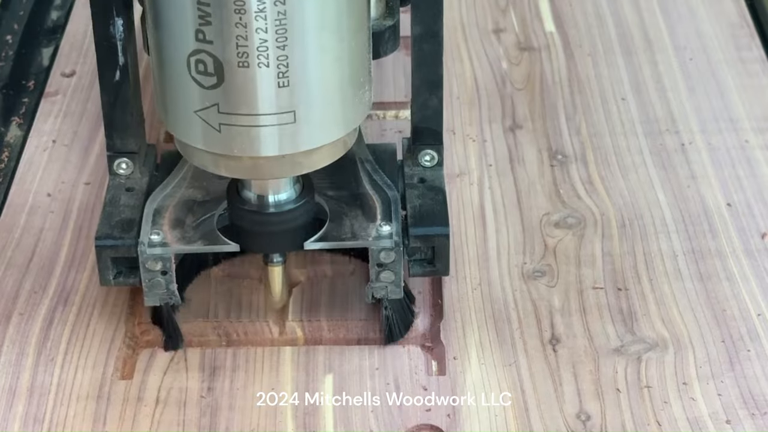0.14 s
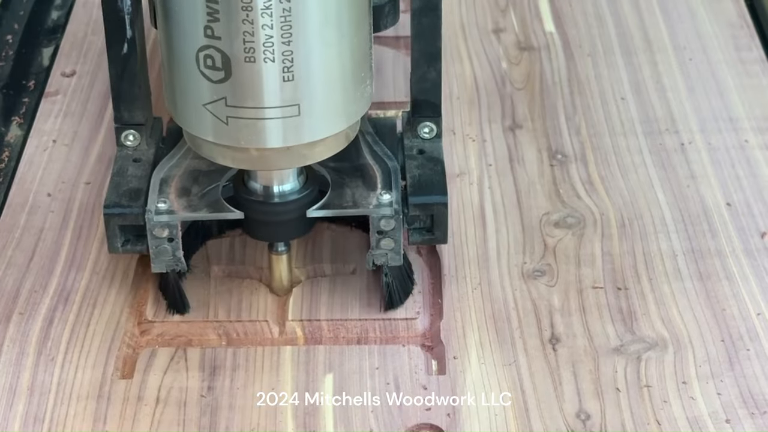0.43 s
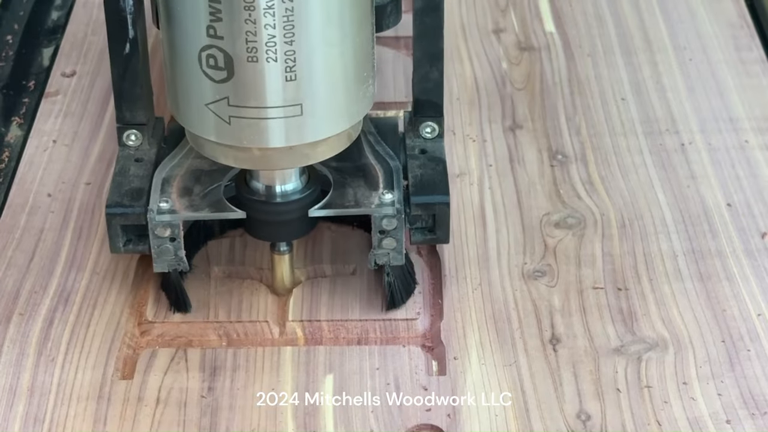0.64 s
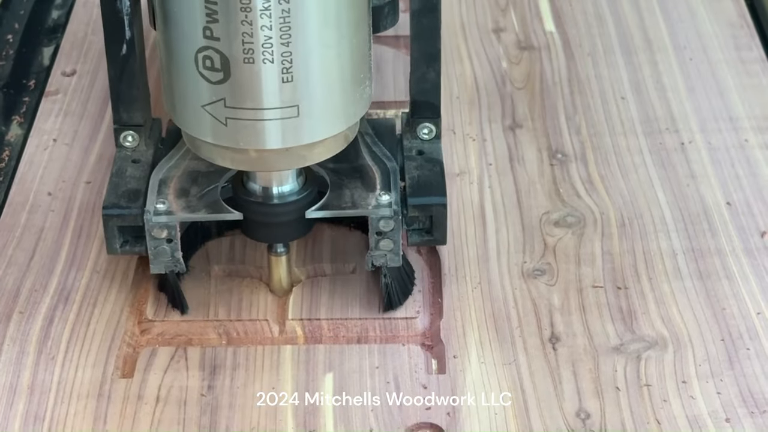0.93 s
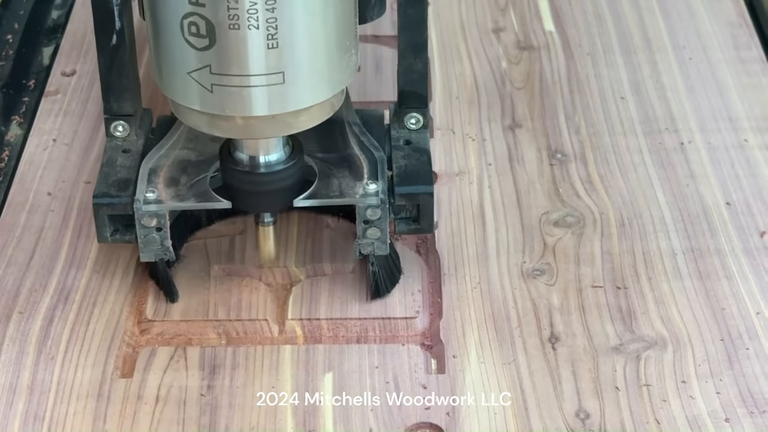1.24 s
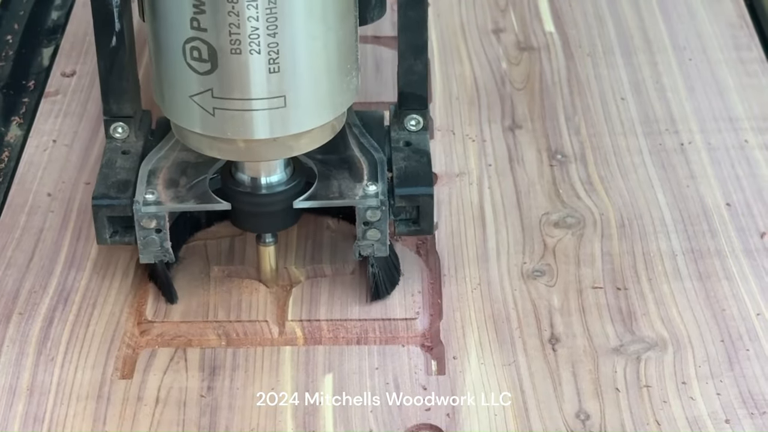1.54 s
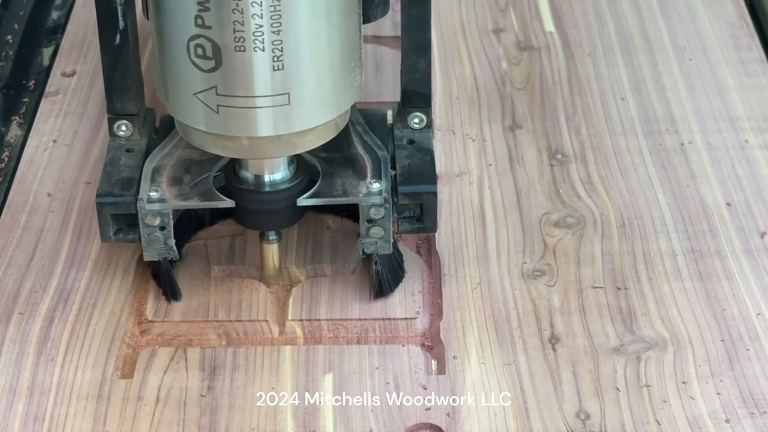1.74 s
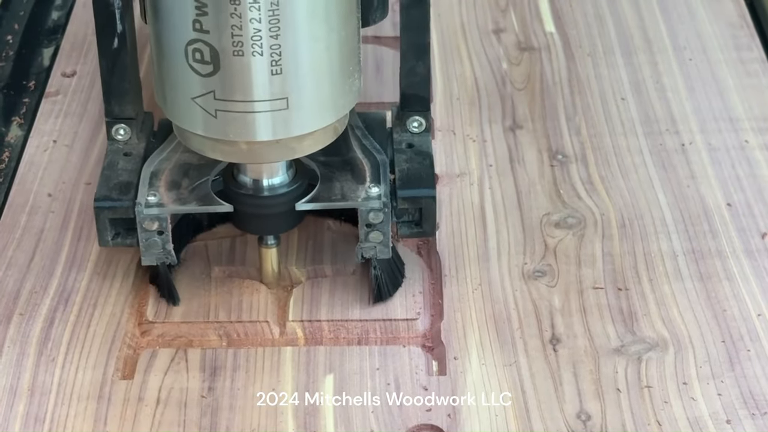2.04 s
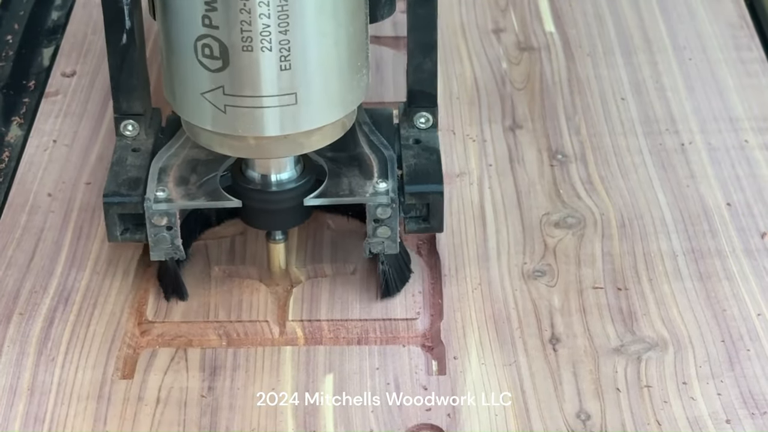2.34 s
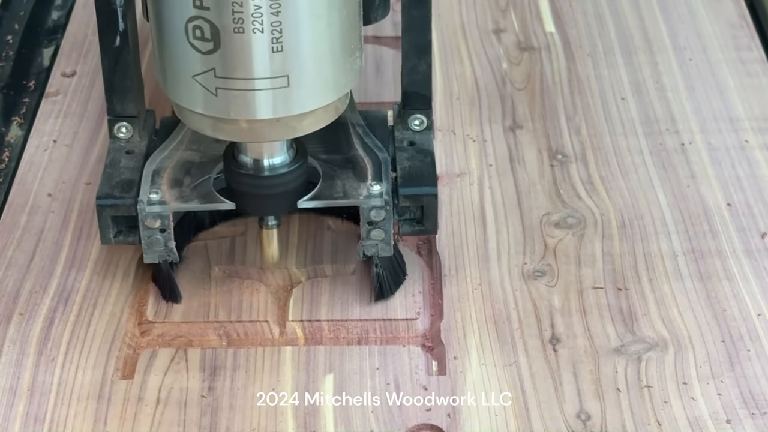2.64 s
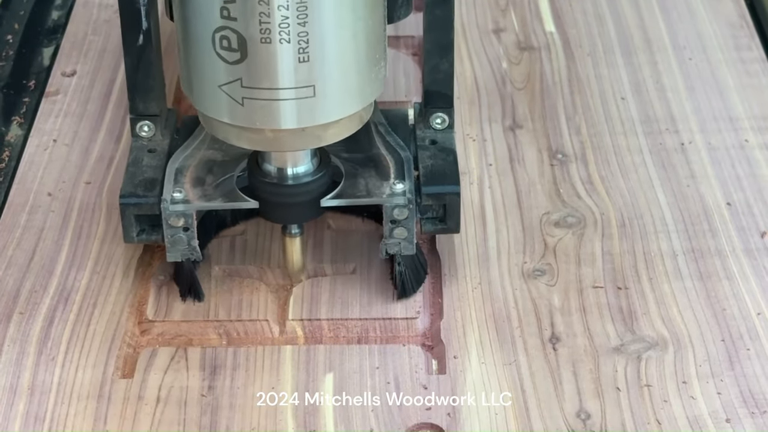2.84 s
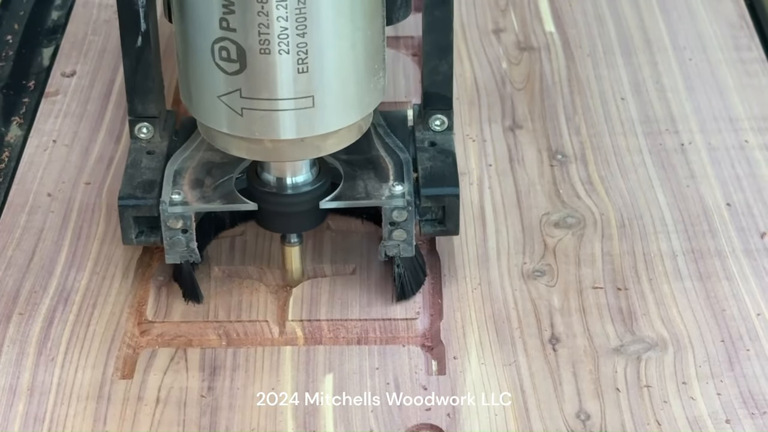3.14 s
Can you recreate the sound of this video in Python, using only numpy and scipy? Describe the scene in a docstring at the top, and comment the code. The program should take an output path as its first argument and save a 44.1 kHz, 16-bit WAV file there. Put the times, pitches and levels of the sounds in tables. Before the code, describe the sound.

Heard up close in a workshop, a wood router hums and hisses steadily, with a faint high whistle and soft thuds from its frame. Brief buzzing bites into the board bunch together past the middle, followed by two gentler cuts.

```python
"""A CNC router carves a wooden board in a workshop, heard from close by.
From the start the spindle hums at about 14850 rpm under a fan tone, rushing air and gantry rumble.
At 0.35 s the lift motor begins to whistle, holding its height; soon the gantry's frame thuds softly.
From 0.9 s the bit catches the wood in short buzzes, one chip per turn, most densely at 2.2 to 2.5 s.
Two longer, softer cuts follow near 3 s, and the machine runs on."""
import sys
import numpy as np
from scipy import signal
from scipy.fft import rfft, irfft
from scipy.io import wavfile

SR = 44100
rng = np.random.default_rng(int(sys.argv[2]) if len(sys.argv) > 2 else 0)


def bounce(signal):
    """Save signal as a 16-bit WAV file at the path given by the first command-line argument."""
    frames = np.transpose(np.atleast_2d(signal))
    limited = np.clip(frames, -1, 1)
    pcm = np.round(limited * 32767).astype(np.int16)
    wavfile.write(sys.argv[1], SR, pcm)


N = 145530
TIME = np.arange(N) / SR
BINS_HZ = np.maximum(np.fft.rfftfreq(N, 1 / SR), 1)
SPINDLE_HZ = 247.6


def cutting(speed_hz):
    """Source and filter: each chip knocks the board, cracks off in splinters and rings the bit."""
    # catches of the bit: start_s, length_s, level_db, edge_db, splinters_db (both relative to level)
    bites = [(0.897, 0.015, -7.5, 6.5, -13), (0.981, 0.0032, -6, 5, -6), (0.99, .002, -4.5, 1.5, -2.5),
             (1.352, 0.045, -9, -17, -12), (1.497, 0.04, -14, -26, -18), (2.172, 0.0048, -6.5, -8, -6),
             (2.182, 0.016, -4, -5, -8.5), (2.348, 0.005, -12, 1.5, -0.5), (2.389, .002, -8, 4, -5),
             (2.397, 0.013, -7, 2.5, -23), (2.414, 0.013, 3.5, -12, -19), (2.434, 0.017, 1, -11, -22),
             (2.463, 0.016, -5, 4, -20), (2.487, 0.0035, -3, 4.5, -6), (2.498, 0.019, -2.5, 2, -10),
             (2.529, 0.0036, -10, 4, -7), (2.537, 0.007, -4.5, -3, -4), (2.892, 0.09, -13.5, -25, -23),
             (3.04, 0.11, -17, -21, -10)]
    # responses of the board and of the cracking edge: frequency_hz, density_db
    board = [(200, -85.5), (350, -70.5), (495, -66), (745, -67.5), (1000, -70.5), (1240, -77.5),
             (1480, -73), (1730, -69.5), (2100, -70.5), (2700, -82.5), (4000, -85), (9000, -110)]
    edge = [(300, -96), (900, -78), (1240, -77), (1480, -70), (1730, -76.5), (1980, -67), (2230, -67.5),
            (2700, -73), (3100, -72.5), (3400, -79), (4000, -79), (5000, -82.5), (6500, -82), (8000, -108),
            (11000, -101), (16000, -112)]
    # mode of the bit: pitch_hz, width_hz, density_db
    bit_mode = [(2997, 91, -74.5)]
    turns = np.cumsum(speed_hz) / SR
    chips = chip_impulses(turns)
    since_chip_s = (turns % 1) / SPINDLE_HZ
    splinters = rms_one(rng.standard_normal(N) * np.exp(-since_chip_s / 0.0038))
    knock = crack = 0
    for start_s, length_s, level_db, edge_db, splinters_db in bites:
        contact = gate(start_s, start_s + length_s, attack_s=0.0068, release_s=0.0029)
        force = from_db(level_db) * contact * (chips + from_db(splinters_db) * splinters)
        knock = knock + force
        crack = crack + from_db(edge_db) * force
    body = colour(knock, from_db(by_hz(board)))
    snap = colour(rasp(crack), from_db(by_hz(edge)))
    ring = colour(knock + crack, np.sqrt(resonances(bit_mode)))
    return through_board(body + snap + ring)


def chip_impulses(turns):
    """Quasi-periodic impulse train: one chip per turn, uneven in timing and size."""
    jitter_s, spread_db = 0.000012, 1.5
    onsets = np.flatnonzero(np.diff(np.floor(turns)))
    jitter, size = rng.standard_normal((len(onsets), 2)).T
    onsets = np.round(onsets + jitter_s * SR * jitter).astype(int)
    chips = np.zeros(N)
    chips[np.clip(onsets, 0, N - 1)] = from_db(spread_db * size)
    return rms_one(chips)


def rasp(crack):
    """Independent amplitude modulation of bands: every chip breaks with its own timbre."""
    # bands of the crack: low_hz, high_hz
    band_limits = [(0, 1600), (1600, 2600), (2600, 3500), (3500, 4600), (4600, 5800), (5800, 22050)]
    spectrum = rfft(crack)
    bands = (irfft(spectrum * ((BINS_HZ >= low) & (BINS_HZ < high)), N) for low, high in band_limits)
    return sum(band * from_db(2.2 * drift(rate_hz=70)) for band in bands)


def through_board(x):
    """Dispersion: allpass echoes in the board spread each knock over a few milliseconds."""
    # paths through the board: delay_s
    paths = [.00017, .00043, .00079, .00121]
    feedback = 0.44
    spectrum = rfft(x)
    for delay_s in paths:
        delay = np.exp(-2j * np.pi * BINS_HZ * delay_s)
        spectrum = spectrum * (delay - feedback) / (1 - feedback * delay)
    return irfft(spectrum, N)


def spindle(speed_hz):
    """Periodic forcing: rotation gives a once-per-turn hum, a fan tone and thin whines."""
    # whines of the spindle and its drive: pitch_hz, level_db, width_hz
    whine_tones = [(495, -64, 8), (745, -62, 47), (992, -70.5, 18), (3933, -67, 22), (5790, -64.5, 30),
                   (7926, -54.5, 20)]
    # swell of all the tones: time_s, gain_db
    swell = [(0, -2.5), (0.7, -2), (1.1, -1), (1.5, -1), (3.3, -1)]
    hum = from_db(-44) * tone(speed_hz, flutter=0.25, rate_hz=9.5)
    fan_hz = 564.8 + 1.105 * drift(rate_hz=1.88)
    fan = from_db(-42) * tone(fan_hz, flutter=0.073, rate_hz=25)
    whines = sum(from_db(db) * tone(hz, flutter=0.75, rate_hz=width) for hz, db, width in whine_tones)
    return (hum + fan + whines) * from_db(in_time(swell))


def air():
    """Broadband noise and resonance: air rushes, and hisses around the spindle and collet."""
    # spectrum of the rush: frequency_hz, density_db
    rush_spectrum = [(100, -91), (330, -83), (450, -79), (680, -79.5), (860, -86.5), (1050, -81.5),
                     (1450, -83), (1800, -80.5), (1980, -85.5), (2150, -80), (2600, -81.5), (3000, -85.5),
                     (3600, -90.5), (4200, -92.5), (4800, -90), (5450, -93.5), (6500, -91), (7300, -89.5),
                     (9000, -93), (10800, -96.5), (11900, -95), (12900, -110), (14500, -101), (15800, -102)]
    # three groups of air resonances: centre_hz, width_hz, density_db
    surging_hiss = [(6200, 260, -79.5)]
    steady_hiss = [(2577, 46, -78), (6720, 334, -78), (7640, 190, -83.5), (8280, 110, -82)]
    high_hiss = [(9430, 150, -85.5), (9900, 150, -85.5), (10110, 196, -85), (10800, 380, -93)]
    # swells of the rush and of each group: time_s, gain_db
    rush_swell = [(0, -1), (0.7, -0.6), (1.5, 0), (3.3, 0)]
    surging_swell = [(0, -3), (0.75, -5), (1.08, -1.5), (1.22, 1.5), (1.38, 0.5), (2.55, -6), (2.64, 4),
                     (2.95, -0.5), (3.3, -3)]
    steady_swell = [(0, -5.5), (0.17, -2), (0.27, -1), (1.25, -0.5), (3.3, 1)]
    high_swell = [(0, -0.63), (0.08, 1.7), (0.27, 1.5), (0.35, -1.6), (0.75, -0.6), (1.1, 1.3), (3.3, 1)]
    rush = stereo_noise(from_db(by_hz(rush_spectrum))) * from_db(in_time(rush_swell))
    groups = (surging_hiss, surging_swell), (steady_hiss, steady_swell), (high_hiss, high_swell)
    hiss = 0
    for peaks, swell in groups:
        hiss = hiss + stereo_noise(np.sqrt(resonances(peaks))) * from_db(in_time(swell))
    throb = from_db(1.27 * tone(hz=43.3, flutter=0.17, rate_hz=2.4))
    flicker = from_db(1.21 * drift(rate_hz=49))
    return (rush + hiss * throb) * flicker


def gantry():
    """Damped vibration: over the rumble of travel, each knock is a brief ring and a shudder."""
    # spectrum of the rumble: frequency_hz, density_db
    rumble_spectrum = [(20, -89), (45, -80.5), (68, -75.5), (88, -78), (120, -76), (160, -72.5), (190, -75),
                       (245, -70), (300, -74.5), (380, -84.5), (700, -105)]
    # swell of the rumble: time_s, gain_db
    swell = [(0, -5), (0.35, -4.5), (0.43, -2.5), (0.6, 0), (1.3, -3), (1.45, 1), (1.75, -1), (2.5, 1),
             (2.8, -4.5), (3.05, 1), (3.3, 0)]
    # modes of the frame: pitch_hz, width_hz, relative_db
    frame_modes = [(118, 34, -7.5), (153, 22.7, -7.5), (245.6, 11, -16.5), (259, 51, 1)]
    # low thuds of the frame, and one higher knock: time_s, level_db, pitch_hz
    knocks = [(0.42, -39, 250), (0.87, -46, 165), (0.993, -41.5, 790), (1.37, -45, 255), (1.435, -46, 251),
              (1.676, -41.5, 136), (1.843, -36.5, 172), (2.025, -46, 165), (2.235, -39, 190),
              (2.253, -35, 239.9), (2.478, -37, 272), (2.5, -47, 130), (2.91, -38.5, 256),
              (2.955, -50, 259), (3.048, -38.5, 277), (3.169, -34, 232), (3.19, -45, 123.6)]
    rumble = stereo_noise(from_db(by_hz(rumble_spectrum)))
    rumble *= from_db(in_time(swell) + 1.5 * drift(rate_hz=15))
    frame_noise = colour(rng.standard_normal(N), np.sqrt(resonances(frame_modes)))
    shudder = from_db(-4) * rms_one(frame_noise)
    thuds = 0
    for time_s, level_db, pitch_hz in knocks:
        ring = np.sqrt(2) * np.sin(2 * np.pi * (pitch_hz * TIME + rng.random()))
        envelope = gate(time_s, time_s, attack_s=0.0112, release_s=0.0107)
        thuds = thuds + from_db(level_db) * envelope * (ring + shudder)
    return rumble + thuds


def lift_motor():
    """A gated tone: the motor whistles while it holds its height and is silent in between."""
    # spells at constant height: start_s, end_s, level_db
    holds = [(0.353, 1.1, -62.5), (1.33, 2.64, -64.5), (2.84, 3.4, -63.5)]
    holding = sum(from_db(db) * gate(start, end, 0.015, 0.015) for start, end, db in holds)
    return holding * tone(hz=11994, flutter=0.1, rate_hz=14)


def workshop(x):
    """Reverberation: dense reflections from the machine and the walls decay exponentially."""
    t60_s, delay_s = 0.096, 0.002
    response = rng.standard_normal((2, N)) * from_db(-60 * TIME / t60_s) * (TIME > delay_s)
    return signal.fftconvolve(x[None], rms_one(response) / np.sqrt(N), axes=1)[:, :N]


def stereo_noise(gain):
    """Partial coherence: coloured noise that is only partly alike in the two channels."""
    # likeness of the channels: frequency_hz, correlation
    likeness = [(100, 0.99), (400, 0.91), (750, 0.62), (1500, 1), (2400, 1), (3700, 0.87), (5600, 1),
                (7300, 0.94), (8000, 1), (8800, 1), (9700, 1), (11500, 0.97), (13000, 0.98), (14500, 0.56)]
    alike = np.clip(by_hz(likeness), 0, .999)
    mid, side = rfft(rng.standard_normal((2, N)))
    spectra = mid * np.sqrt((1 + alike) / 2) + side * np.sqrt((1 - alike) / 2) * [[1], [-1]]
    return colour(irfft(spectra, N), gain)


def tone(hz, flutter, rate_hz):
    """Random modulation: a sine of unit power wavers in level and phase."""
    turns = np.cumsum(hz * np.ones(N)) / SR + rng.random()
    modulation = 1 + flutter * (drift(rate_hz) + 1j * drift(rate_hz))
    return rms_one(np.real(modulation * np.exp(2j * np.pi * turns)))


def colour(x, gain):
    """Minimum-phase filter: gives unit white noise the stated gain per root Hz."""
    cepstrum = irfft(np.log(gain * np.sqrt(SR / 2) + 1e-12), N)
    causal_fold = 1 + np.sign(np.fft.fftfreq(N))
    return irfft(rfft(x) * np.exp(rfft(cepstrum * causal_fold)), N)


def resonances(rows):
    """Summed power response of steep-sided resonances."""
    return sum(from_db(db) ** 2 / (1 + ((BINS_HZ - hz) / width) ** 2 * 2) ** 2 for hz, width, db in rows)


def drift(rate_hz):
    """Low-pass noise: a random fluctuation of unit power."""
    return rms_one(irfft(rfft(rng.standard_normal(N)) / (1 + (BINS_HZ / rate_hz) ** 2), N))


def gate(start_s, end_s, attack_s, release_s):
    """Envelope: a linear rise before the start, a hold, an exponential decay after the end."""
    rise = np.clip((TIME - start_s) / attack_s + 1, 0, 1)
    return rise * np.exp(-np.maximum(TIME - end_s, 0) / release_s)


def in_time(rows):
    """Linear interpolation to every sample."""
    return np.interp(TIME, *np.transpose(rows))


def by_hz(points):
    """Log-frequency interpolation to every bin."""
    hz, value = np.transpose(points)
    return np.interp(np.log(BINS_HZ), np.log(hz), value)


def from_db(db):
    """Decibels to amplitude ratio."""
    return 10 ** (np.asarray(db) / 20)


def rms_one(x):
    """Normalisation to unit power."""
    return x / np.sqrt(np.mean(np.abs(x) ** 2) + 1e-20)


def scene():
    """Superposition of the running machine, its cuts and their reverberation."""
    speed_hz = SPINDLE_HZ + 0.35 * drift(rate_hz=11)
    cuts = cutting(speed_hz)
    running = spindle(speed_hz) + air() + lift_motor() + gantry()
    return running + cuts + from_db(-18.5) * workshop(cuts)


def record(dry):
    """Phase and level differences between two microphone ports, then a steep low-pass."""
    # phase between the ports: frequency_hz, left_lead_rad
    phase = [(100, 0), (380, 0), (560, -.45), (800, .2), (1300, 0), (2400, 0), (3600, .45), (5300, 0),
             (6400, .05), (7200, .9), (7700, 2), (7950, 3.1), (8800, 3.15), (9100, 1.7), (10300, .8),
             (11100, 0), (13500, -.1), (15500, -2.4)]
    # balance of the ports: frequency_hz, left_minus_right_db
    balance = [(60, .8), (250, 1.5), (400, 1.5), (570, 2.9), (1200, .4), (2400, 0)]
    cutoff_hz = 15800
    sides = np.array([[.5], [-.5]])
    ports = from_db(sides * by_hz(balance)) * np.exp(1j * sides * by_hz(phase))
    low_pass = 1 / np.sqrt(1 + (BINS_HZ / cutoff_hz) ** 300)
    return irfft(rfft(dry) * ports * low_pass, N)


dry = scene()
out = record(dry)
bounce(out)
```